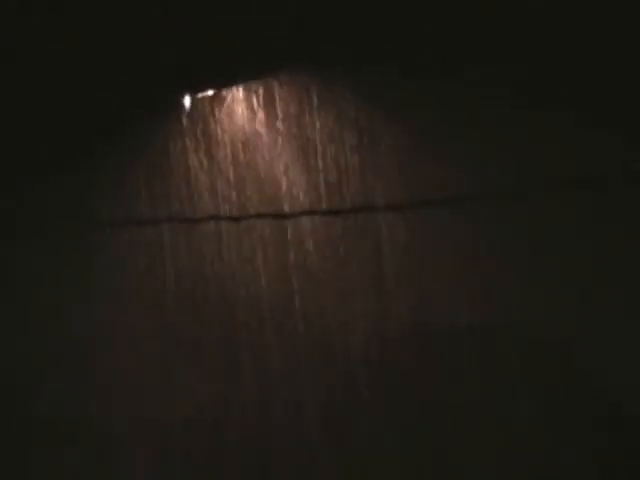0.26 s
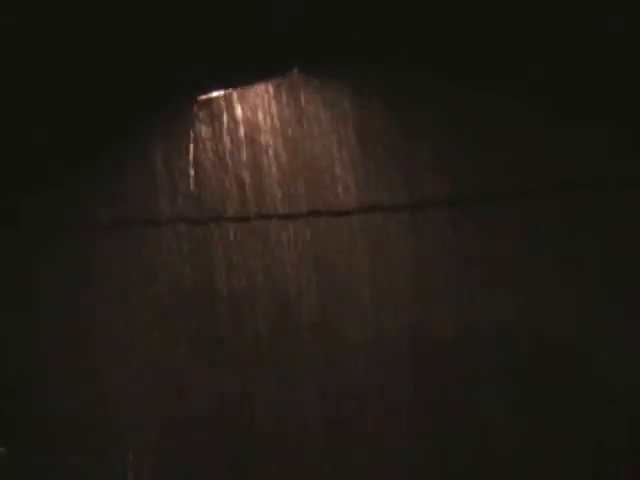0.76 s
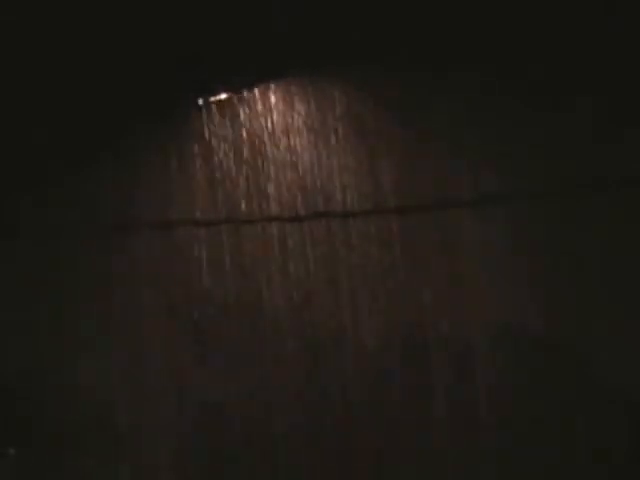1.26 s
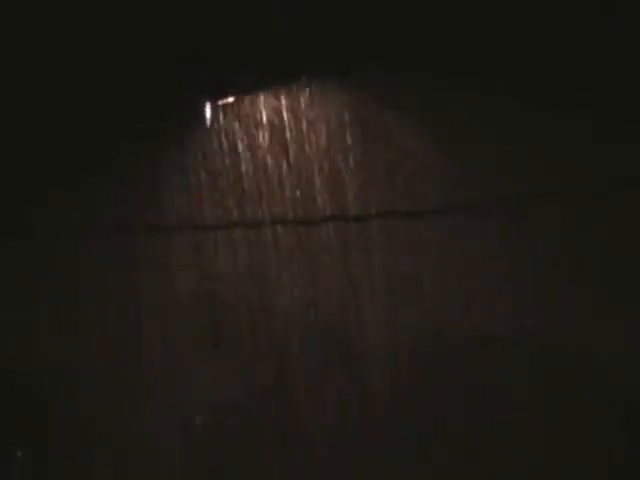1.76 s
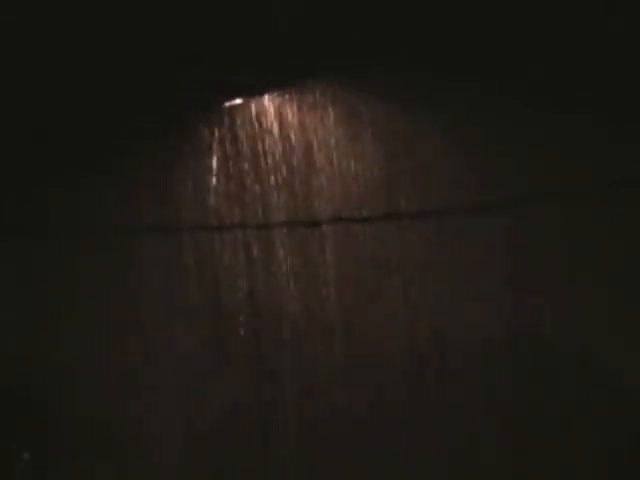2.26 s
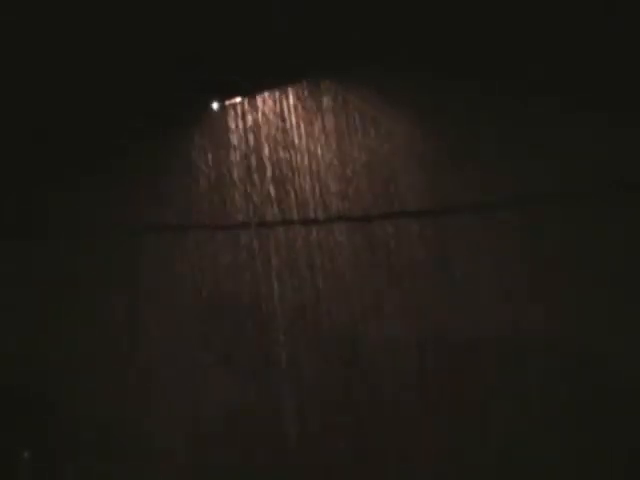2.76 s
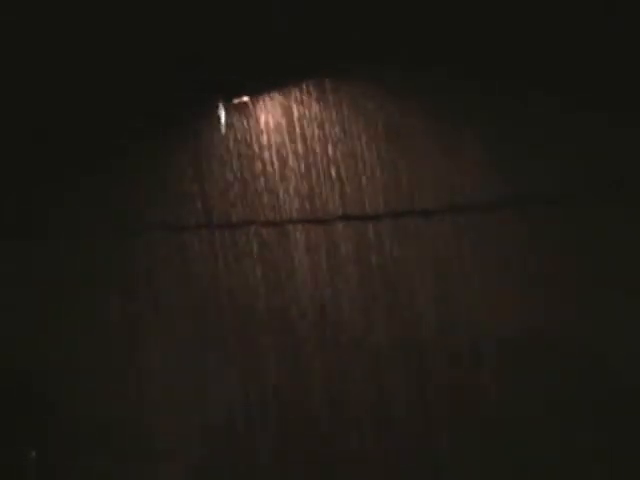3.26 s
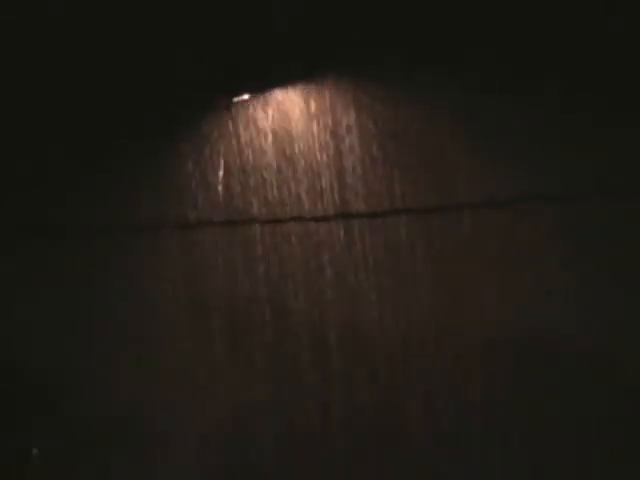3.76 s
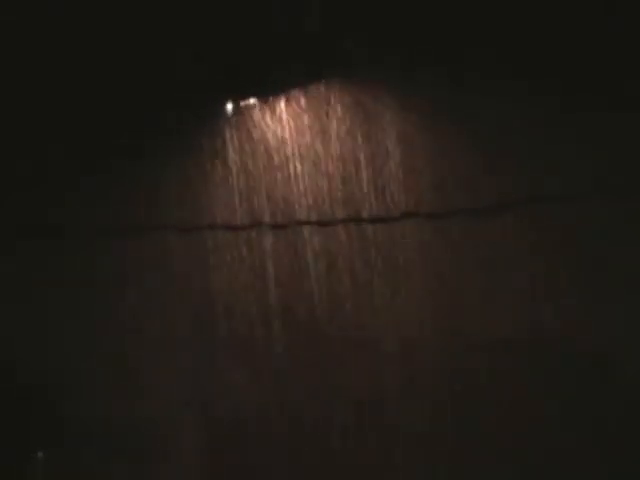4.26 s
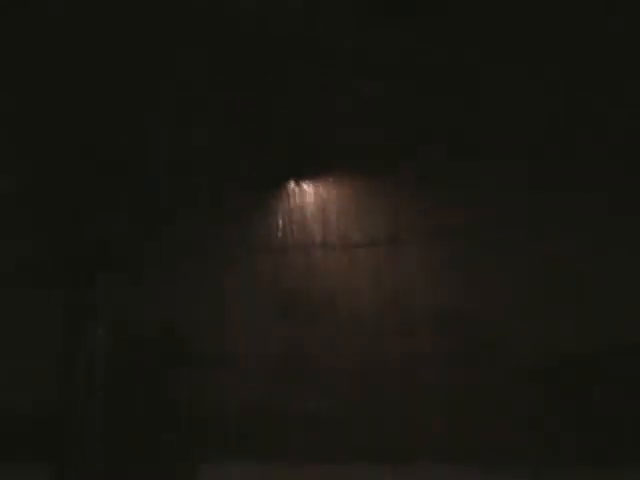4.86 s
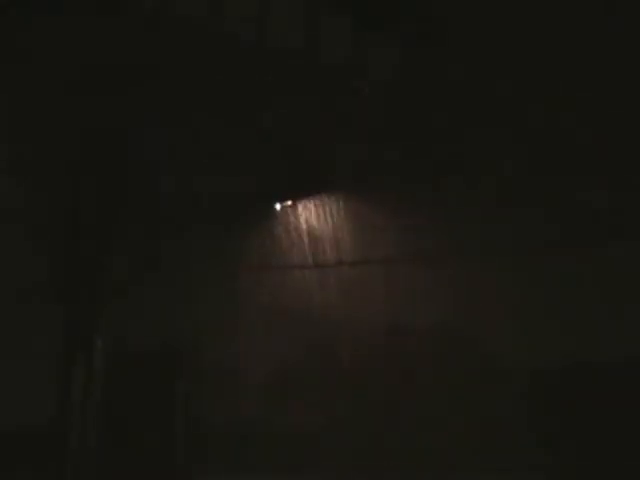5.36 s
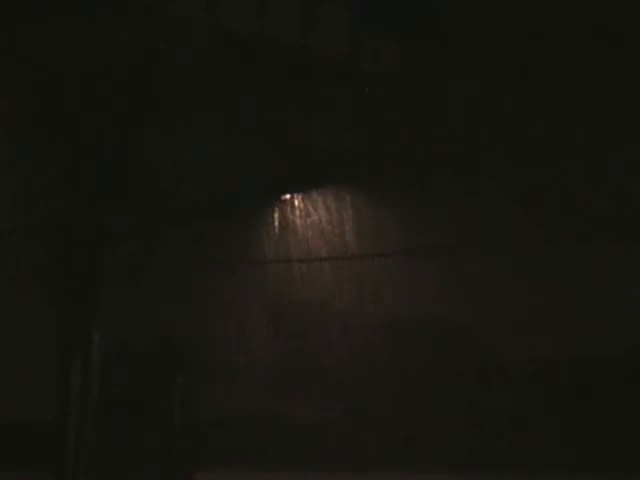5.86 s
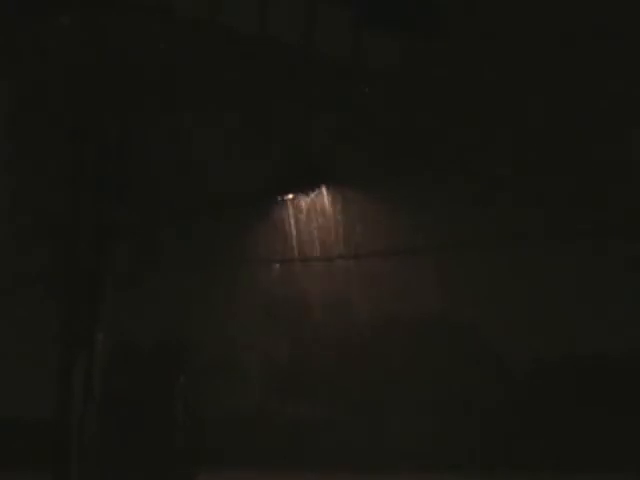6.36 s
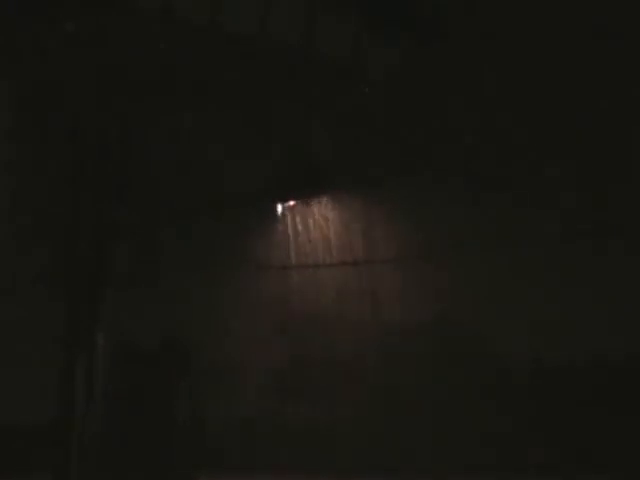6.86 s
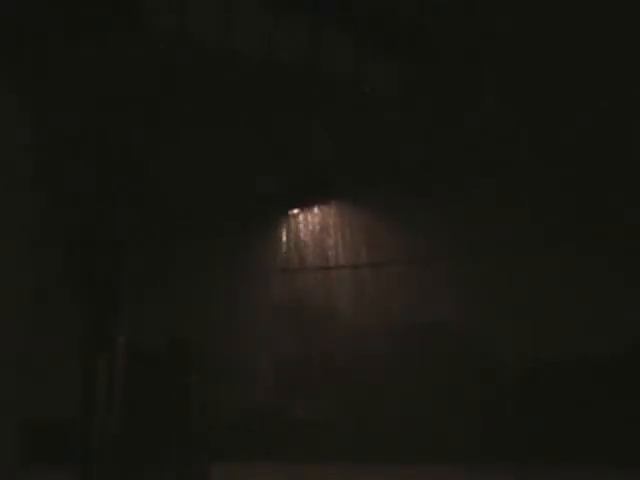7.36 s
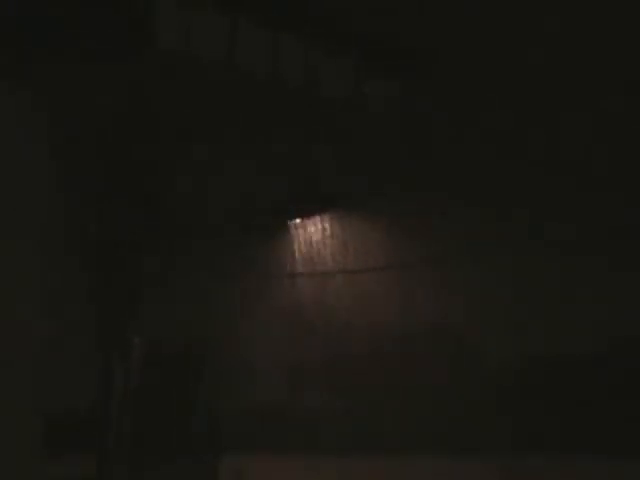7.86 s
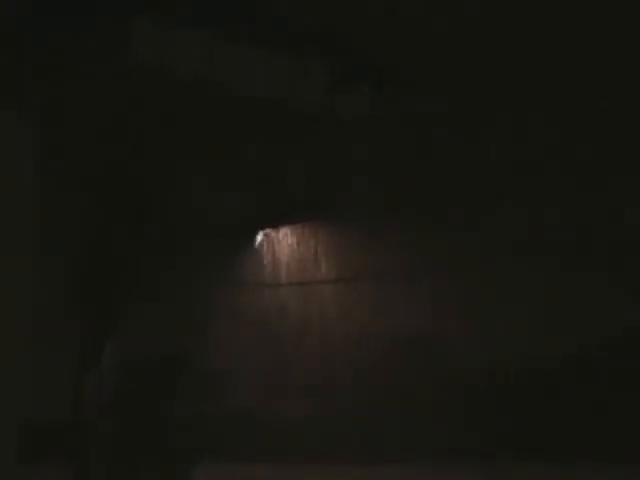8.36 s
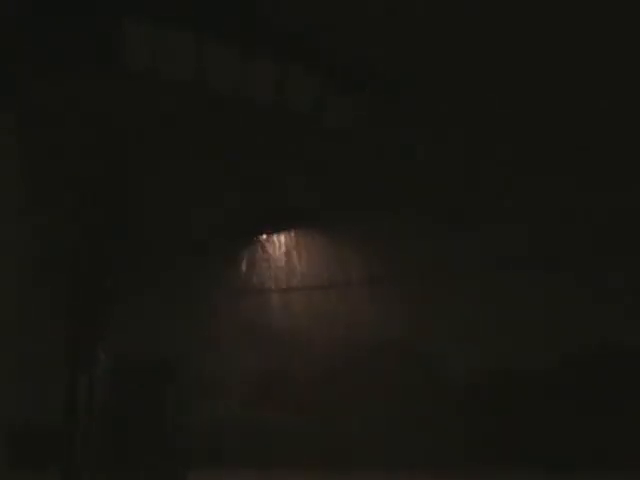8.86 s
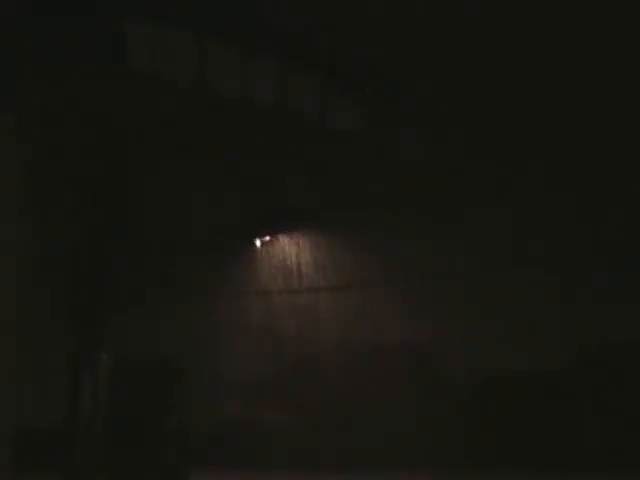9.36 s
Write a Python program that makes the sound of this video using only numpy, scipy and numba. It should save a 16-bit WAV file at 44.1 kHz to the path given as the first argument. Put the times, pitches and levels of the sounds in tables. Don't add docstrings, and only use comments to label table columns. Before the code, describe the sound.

Heavy steady rain at night hisses on paving over a low roof drone, with sharp single drops ticking close to the microphone.

```python
import sys
import numpy as np
from scipy import signal
from scipy.fft import rfft, irfft, next_fast_len
from scipy.io import wavfile
from scipy.ndimage import uniform_filter1d, minimum_filter1d, map_coordinates
from numba import njit

SR = 44100
rng = np.random.default_rng(int(sys.argv[2]) if len(sys.argv) > 2 else 0)


def to_wav(sig):
    pcm = np.clip(np.atleast_2d(sig), -1, 1) * 32767
    pcm = np.round(pcm).astype(np.int16)
    wavfile.write(sys.argv[1], SR, pcm.T)


def volts_from_db(level):
    exponent = np.asarray(level, float) / 20
    return 10 ** exponent


N = 424241
CEILING_DB = -7


def unit(x):
    return x / np.sqrt(np.mean(x ** 2) + 1e-20)


def along(points, hz):
    f, v = np.transpose(points)
    return np.interp(np.log(hz + 1), np.log(f + 1), v)


def filtered(x, response):
    m = next_fast_len(N + 8192)
    gain = response(np.fft.rfftfreq(m, 1 / SR))
    return irfft(rfft(x, m) * gain, m)[..., :N]


def wobble(rate):
    points = rng.standard_normal(int(N * rate / SR) + 4)
    return unit(map_coordinates(points, [np.arange(N) * rate / SR]))


def bumps(rows, t, width_s):
    return sum(height * np.exp(-((t - s) / width_s) ** 2) for s, height in rows)


def merged_drops(patchy_db):
    z = signal.stft(rng.standard_normal((2, N)), nperseg=512)[2]
    patches = uniform_filter1d(rng.standard_normal(z.shape[1:]), size=12, axis=0)
    patches = uniform_filter1d(patches, size=8, axis=1)
    noise = signal.istft(z * volts_from_db(patchy_db * unit(patches)), nperseg=512)[1]
    return unit(noise[:, :N])


def ticks(s, hz, peak, cycles, size=160):
    k = np.arange(size)
    u = k / SR * (hz / cycles)[:, None]
    swell = peak[:, None] * np.e * u * np.exp(-u)
    burst = swell * np.cos(2 * np.pi * (u - 1) * cycles[:, None])
    start = np.round((s - cycles / hz) * SR).astype(int)
    at = np.clip(start[:, None] + k, 0, N)
    return np.bincount(at.ravel(), burst.ravel(), N + 1)[:N]


def patter(count, centre_hz, octaves, spread_db, cycles, size):
    u, g = rng.random((count, 3)), rng.standard_normal((count, 2))
    hz = np.clip(centre_hz * 2 ** (octaves * g[:, 0]), 300, 11000)
    peak = volts_from_db(-spread_db * np.log(1 - .99 * u[:, 1])) * np.sign(u[:, 2] - .5)
    peak = peak * (hz / centre_hz) ** 0.54
    return unit(ticks(u[:, 0] * N / SR, hz, peak, cycles * 1.4 ** g[:, 1], size))


def sheet(spectrum, patchy_db, drops, share):
    colour = lambda hz: volts_from_db(along(spectrum, hz))
    far = filtered(merged_drops(patchy_db), colour)
    near = filtered(drops, colour)
    return unit(far) * np.sqrt(1 - share) + unit(near) * np.sqrt(share)


# t/s, level/dB
POUR = [
    (0.0, -17.5),
    (1.37, -18),
    (1.6, -17.5),
    (2.54, -17),
    (2.81, -17.5),
    (6.08, -17.5),
    (6.38, -18),
    (9.62, -18),
]


def pour_strength(t):
    return np.interp(t, *np.transpose(POUR)) + .35 * wobble(5) + .5 * wobble(25)


# f/Hz, level/dB
PAVING = [(880, -34.5), (1500, -7), (1880, 0.5), (2260, -1), (2730, 0), (3660, -0.5), (8760, 0), (9470, -2),
          (11500, -13), (13600, -16.5), (14700, -14), (15600, -16.5)]


def paving():
    splash = [patter(count=22000, centre_hz=8400, octaves=.7, spread_db=3.0, cycles=.8, size=80)
              for part in range(2)]
    return sheet(PAVING, patchy_db=0.67, drops=np.array(splash), share=0.3)


# f/Hz, level/dB
ROOFS = [(15, -67), (25, -61), (69, -18), (199, -9.5), (295, -4.5), (749, -3), (945, -0.5), (1330, -1),
         (1530, -5), (1800, -6), (2340, -31), (3960, -120)]


def roofs():
    drum = [patter(count=6000, centre_hz=1016, octaves=0.6, spread_db=2.5, cycles=1.2, size=200)
            for part in range(2)]
    return sheet(ROOFS, patchy_db=0.67, drops=np.array(drum), share=0.12)


# t/s, level/dB over the limiter's ceiling, f/Hz
CLOSE_DROPS = [(0.1478, 5, 6200), (0.6664, 3, 8800), (0.7765, 3, 5000), (1.2774, 1.6, 8700),
               (1.4864, 3, 6700), (1.642, 3, 6500), (1.7275, 4.5, 4700), (1.7654, 5, 9100),
               (2.1154, 4, 9200), (2.5391, 1, 3440), (3.0992, 1, 6460), (3.2453, 2, 4500),
               (3.5499, 2, 7300), (3.9075, 8, 9260), (4.3966, 1.5, 7000), (4.5388, 2, 5600),
               (4.6535, 5, 8900), (6.5094, 3.5, 5200), (6.5675, 1.6, 8900), (6.9, 1, 3340),
               (7.2497, 10, 7400), (7.8405, 1, 4400), (7.8444, 6, 8800), (8.3776, 3, 8200),
               (8.843, 0.5, 3240), (8.9967, 1.5, 9200), (9.3587, 3, 8600), (9.365, 6, 7800),
               (9.4228, 3.5, 7000), (9.4364, 4.8, 9400)]


def close_drops():
    s, over_db, hz = np.transpose(CLOSE_DROPS)
    peak = volts_from_db(CEILING_DB + 1.04 * over_db + 1.0)
    strikes = ticks(s, hz, peak, 1.2 * np.sqrt(hz / 8000))
    return filtered(strikes, lambda hz: volts_from_db(np.minimum(along(PAVING, hz) + 2, 0)))


# t/s, level/dB over the pour
GUSTS = [(.45, 0.5), (1.57, 0), (2.34, 0.5), (3.13, 1), (3.96, 1), (4.77, 3), (5.38, 2), (6.25, 1),
         (7.77, 2), (8.0, 1), (8.61, 1)]


def gusts(t):
    coarse = t[::64]
    return np.interp(t, coarse, bumps(GUSTS, coarse, width_s=0.023))


def downpour():
    t = np.arange(N) / SR
    pour_db, gust_db = pour_strength(t), gusts(t)
    roofs_db = pour_db - 8 + .35 * wobble(16) + 1.1 * gust_db
    return volts_from_db(pour_db + gust_db) * paving() + volts_from_db(roofs_db) * roofs()


# f/Hz, level/dB of the unrelated side part
WIDTH = [(60, -11), (110, -11), (200, -16), (380, -9), (700, -9), (1290, -8), (2380, -9), (4400, -7),
         (8120, -15), (15000, 7)]
# f/Hz, level/dB
TILT = [(60, 0), (110, 3), (200, 3.5), (380, 2.5), (700, 2), (1290, 0.5), (2380, 0.5), (4400, 1.5),
        (8120, 0.5), (15000, -0.5)]
# f/Hz, phase/rad
LEAD = [(0, 0), (600, 0.49), (1980, 0.0), (15300, -0.0)]


def scene():
    middle, side = downpour()
    lean = lambda hz: volts_from_db(along(TILT, hz) / 2) * np.exp(.5j * along(LEAD, hz))
    pair = filtered(middle + close_drops(), lambda hz: np.array([lean(hz), 1 / lean(hz)]))
    side = filtered(side, lambda hz: volts_from_db(along(WIDTH, hz) - 1.8))
    return pair + np.array([side, -side])


@njit
def recover(cut_db, keep):
    out = cut_db.copy()
    for i in range(1, len(out)):
        out[i] = max(out[i], out[i - 1] * keep)
    return out


def limiter(x, ahead_s, release_s, sense_s):
    reach = round(ahead_s * SR)
    sensed = np.abs(uniform_filter1d(2 * (x ** 2).max(0), max(round(sense_s * SR), 1)))
    room_db = np.minimum(CEILING_DB - 10 * np.log10(sensed + 1e-12), 0)
    needed_db = -minimum_filter1d(room_db, 2 * reach + 1)
    cut_db = recover(needed_db, np.exp(-1 / (release_s * SR)))
    return x * volts_from_db(-uniform_filter1d(cut_db, reach))


def luck(shape, rows, frames):
    draws = rng.standard_normal((shape[0] // rows + 1, shape[1]))
    draws = unit(uniform_filter1d(draws, frames, axis=1))
    return np.repeat(1 / (1 + np.exp(-1.7 * draws)), rows, axis=0)[:shape[0]]


# t/s, added share kept (0-1)
RICH = [(.2, .55), (.72, .3), (.98, .3), (1.18, .5), (1.4, .25), (1.65, .15), (2.0, .42), (2.52, .55),
        (2.93, .3), (3.12, .2), (3.43, .48), (3.9, .18), (4.32, .38), (4.9, .3), (5.2, .38), (5.71, .6),
        (6.31, .42), (6.76, .32), (7.36, .36), (7.7, .2), (7.85, .22), (8.18, .38), (8.5, .3), (8.85, .2),
        (9.12, .34), (9.42, .34)]


def treble_share(t):
    return .12 + bumps(RICH, t, width_s=.085) + .03 * rng.standard_normal(len(t))


# f/Hz, added share kept
FAVOUR = [(11700, 1.2), (12300, .55), (12750, .15), (13100, -.02), (13900, -.09), (14300, -.05),
          (14800, .27), (15150, .1), (15300, -1)]
# from t/s, to t/s
WIDE = [(0, 0.151), (0.267, 0.453), (0.638, 0.848), (0.94, 1.057), (1.195, 1.382), (1.613, 1.73),
        (1.799, 2.009), (2.101, 2.241), (2.542, 2.868), (3.03, 3.17), (3.262, 3.402), (3.471, 3.634),
        (3.703, 3.774), (4.121, 4.284), (4.377, 4.563), (4.864, 5.004), (5.143, 5.376), (5.421, 5.515),
        (5.7, 5.84), (5.932, 6.119), (6.397, 6.537), (6.768, 6.955), (7.0, 7.094), (7.279, 7.628),
        (7.743, 7.884), (8.115, 8.302), (8.417, 8.534), (8.719, 8.882), (9.183, 9.323), (9.392, 9.555)]


def flickering_treble(x, split_hz, top_hz, fade_s, gaps):
    hz, t, (middle, side) = signal.stft([x[0] + x[1], x[0] - x[1]], SR, "cosine", nperseg=2048)
    band_hz = np.repeat(hz[::6], 6)[:len(hz)] + 80
    top = luck(side.shape, 6, 4) < treble_share(t) + along(FAVOUR, band_hz)[:, None]
    start, end = np.transpose(WIDE)[:, :, None]
    inside = np.minimum(t - start, end - t).max(0)
    ragged = 1.4 * luck(side.shape, 16, 1) - .1 + (hz[:, None] / top_hz) ** 12 * 3
    wide = inside > fade_s * ragged
    solid = (hz[:, None] < 1400) | (luck(side.shape, 8, 4) > gaps)
    low = (hz[:, None] < split_hz) & solid
    kept = [middle * top, side * top * (wide | low)]
    middle, side = signal.istft(kept, SR, "cosine", nperseg=2048)[1][:, :N]
    return np.array([middle + side, middle - side]) / 2


def roll_off(x):
    return signal.sosfilt(signal.butter(12, 15600, fs=SR, output="sos"), x)


def record(dry):
    held = limiter(dry, ahead_s=0.0023, release_s=0.012, sense_s=0.00038)
    mix = flickering_treble(held, split_hz=4000, top_hz=13000, fade_s=.024, gaps=.2)
    return roll_off(mix)


dry = scene()
out = record(dry)
to_wav(out)
```